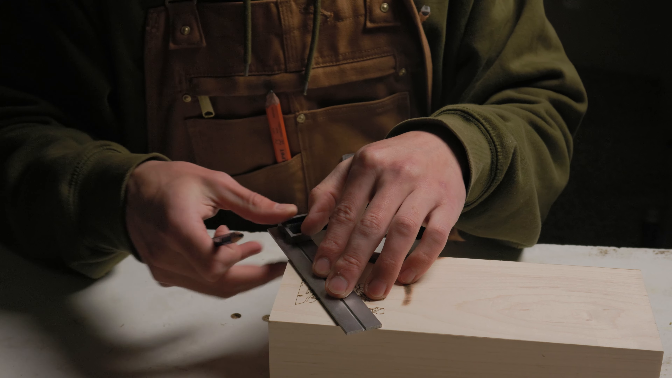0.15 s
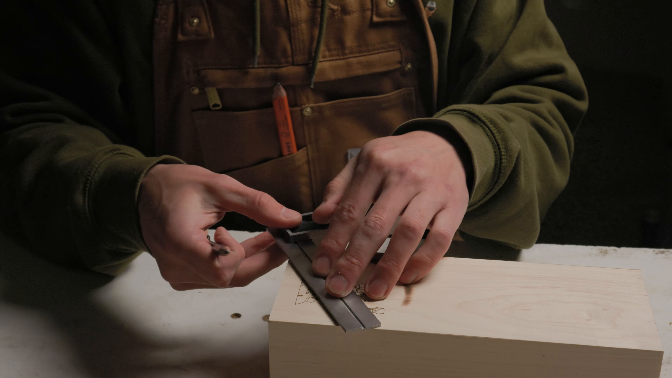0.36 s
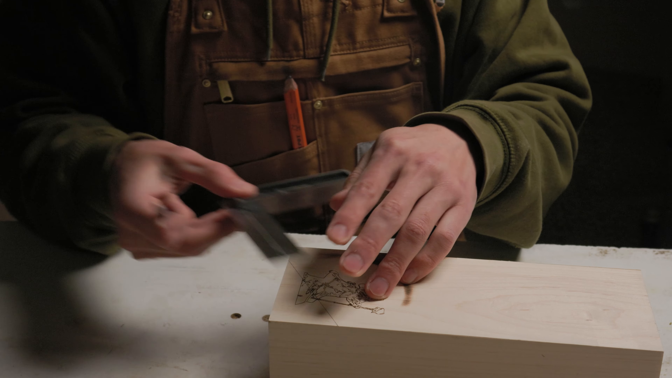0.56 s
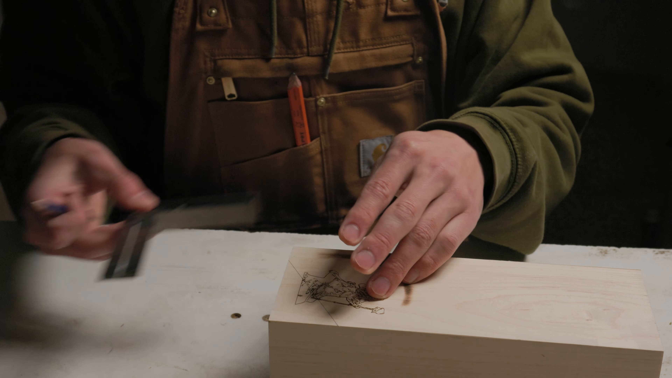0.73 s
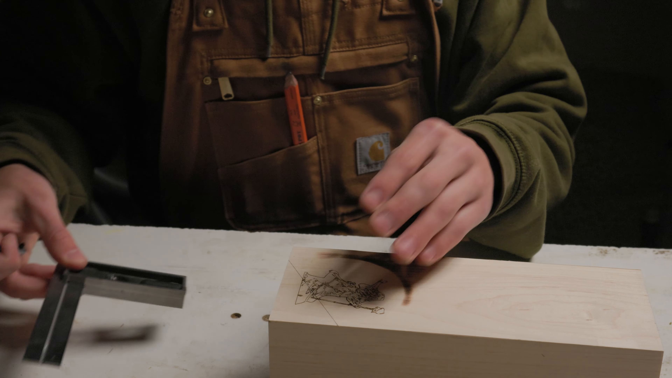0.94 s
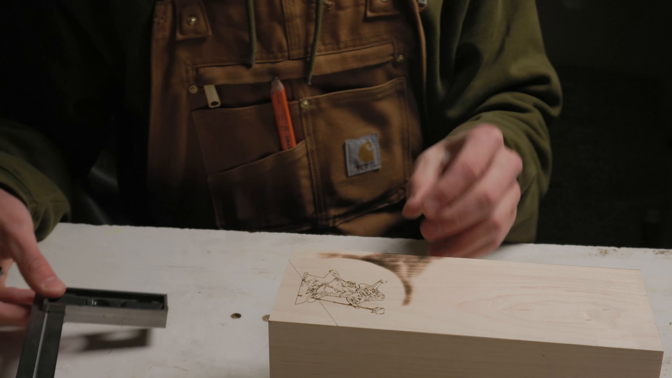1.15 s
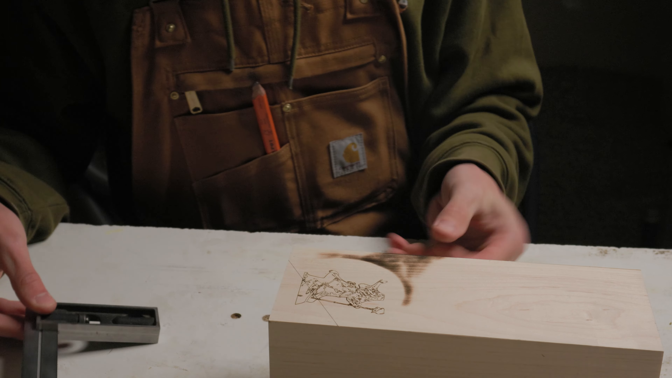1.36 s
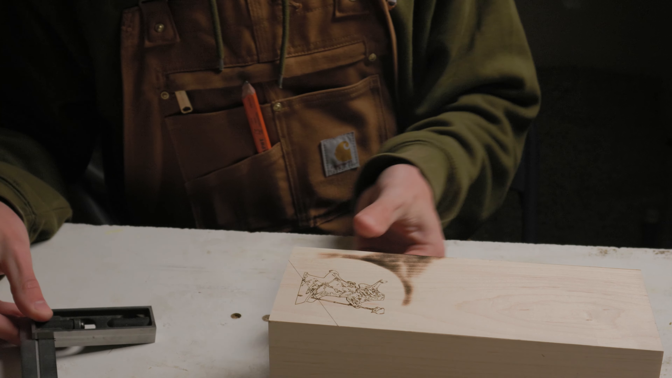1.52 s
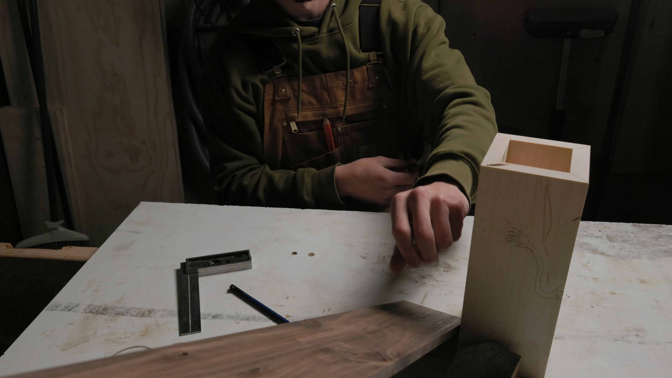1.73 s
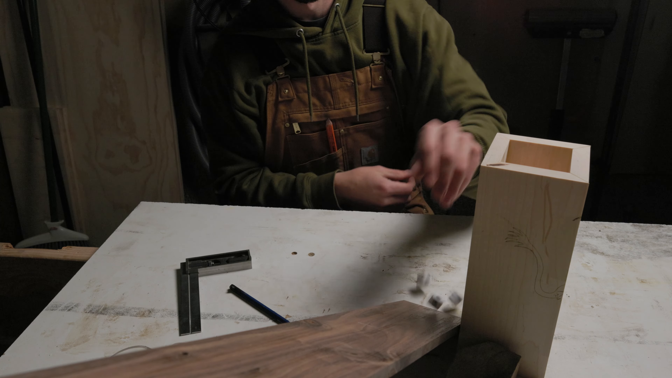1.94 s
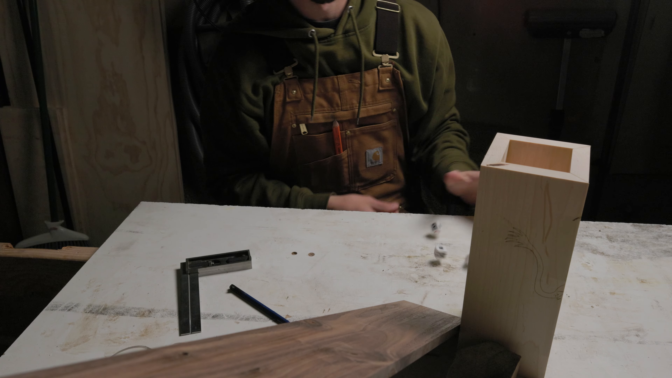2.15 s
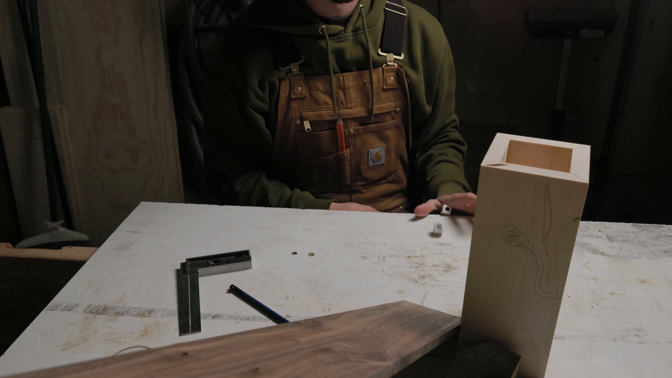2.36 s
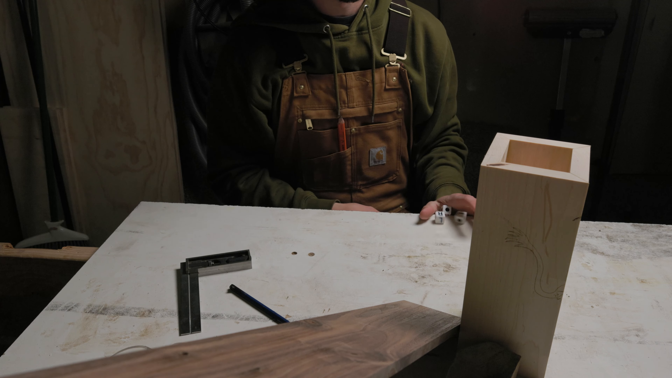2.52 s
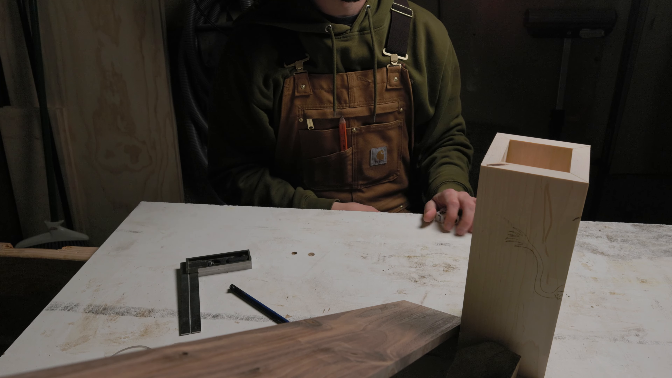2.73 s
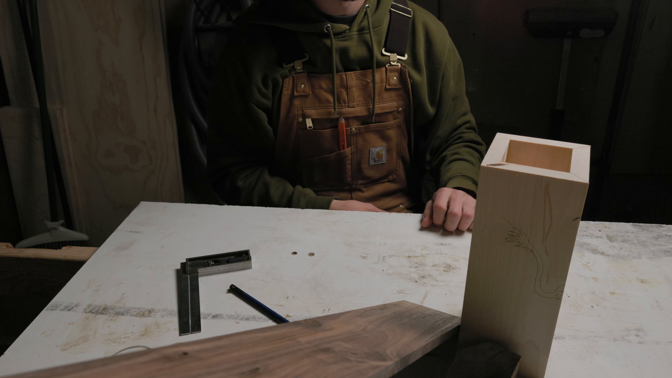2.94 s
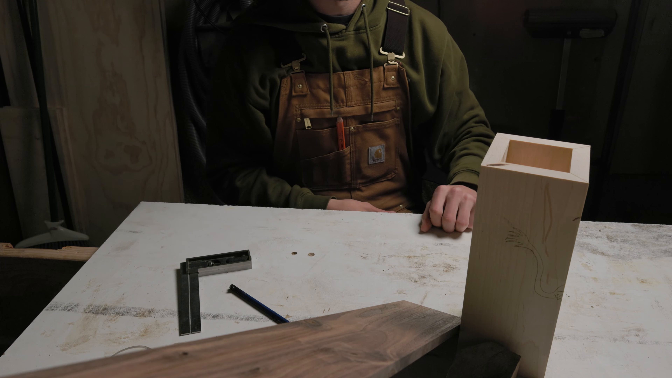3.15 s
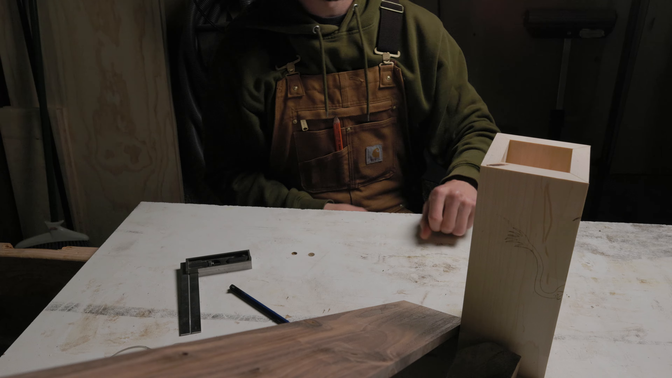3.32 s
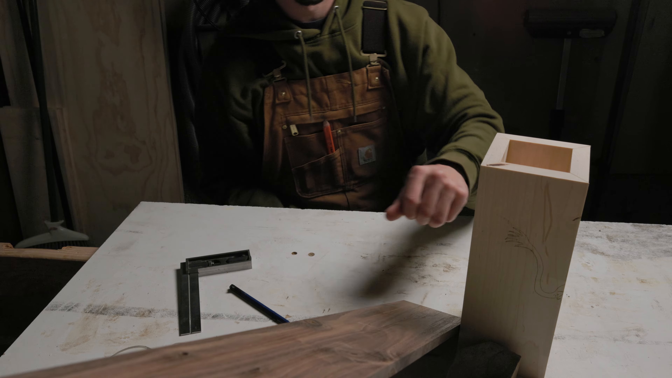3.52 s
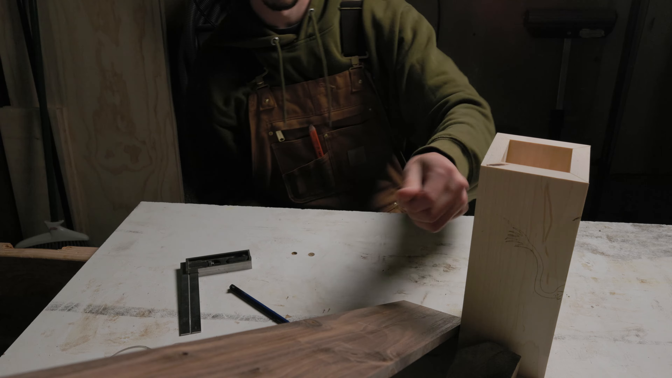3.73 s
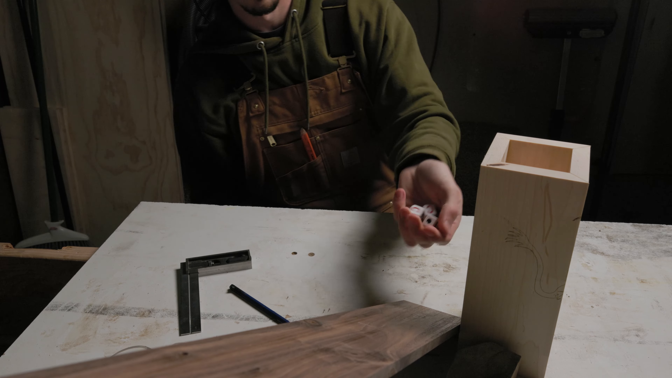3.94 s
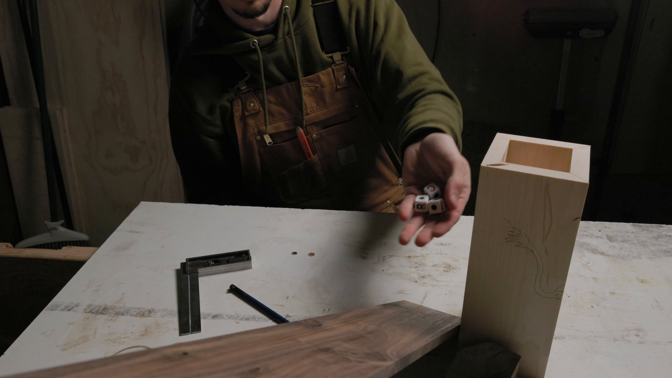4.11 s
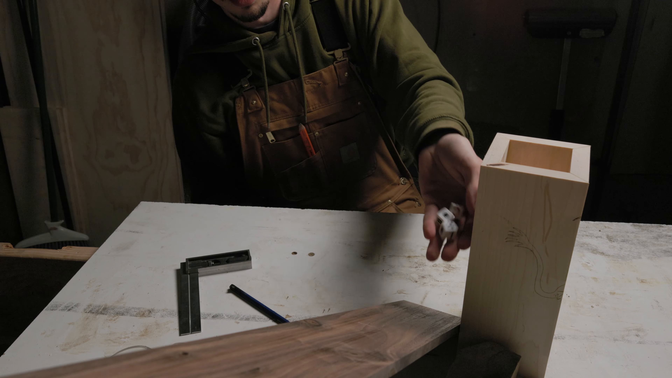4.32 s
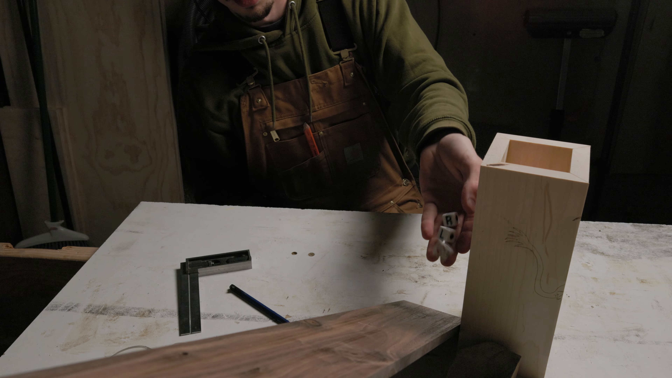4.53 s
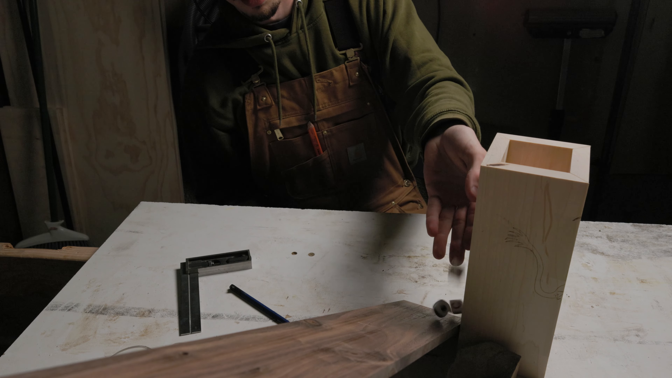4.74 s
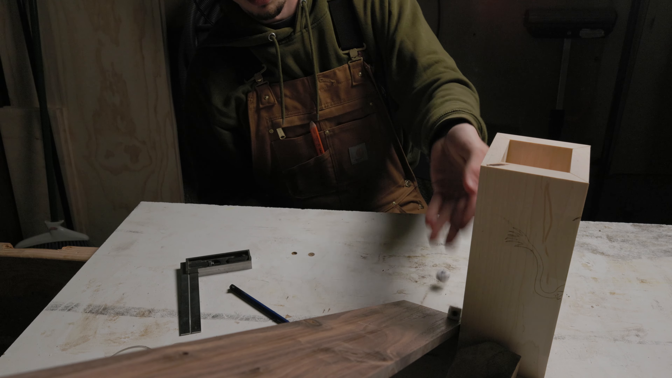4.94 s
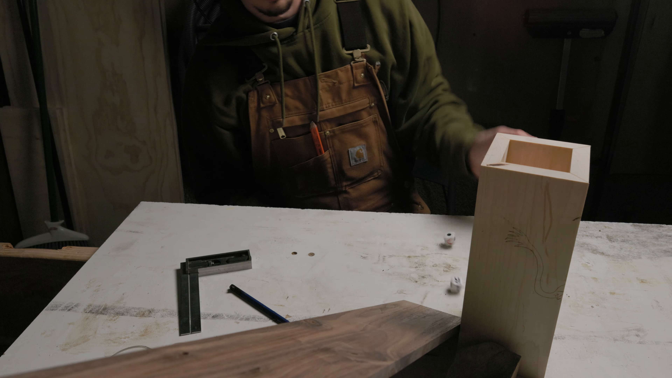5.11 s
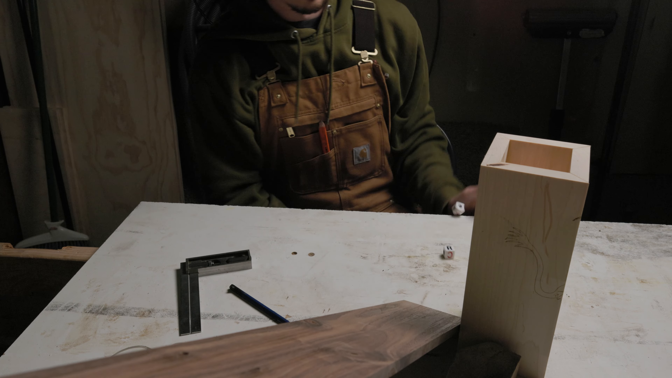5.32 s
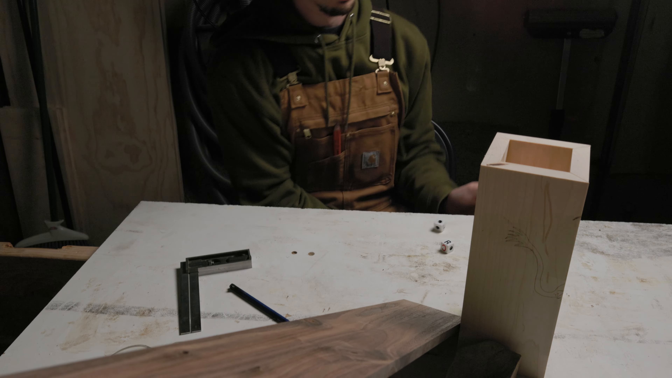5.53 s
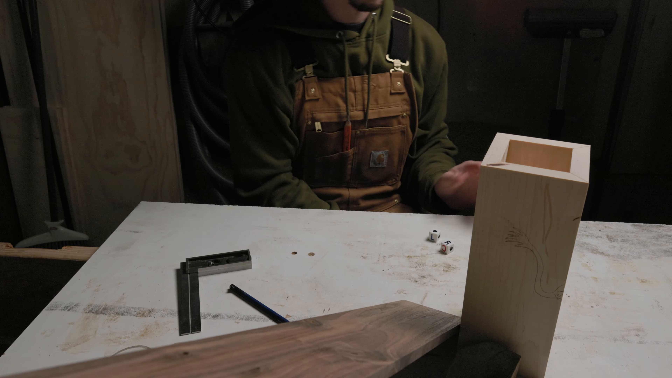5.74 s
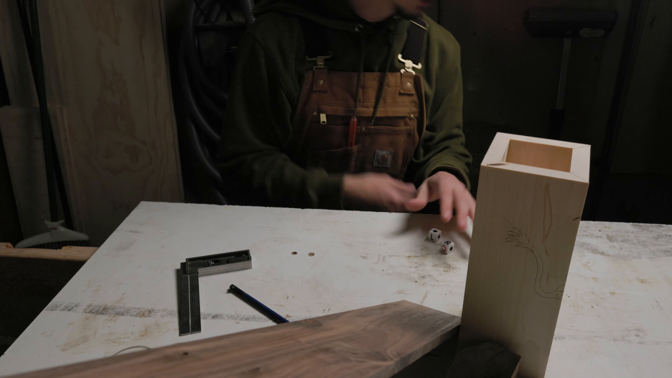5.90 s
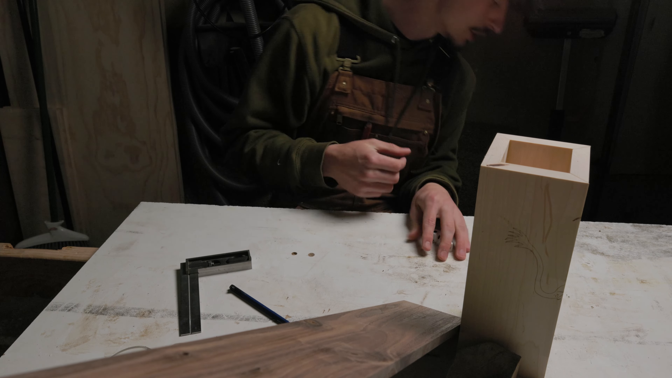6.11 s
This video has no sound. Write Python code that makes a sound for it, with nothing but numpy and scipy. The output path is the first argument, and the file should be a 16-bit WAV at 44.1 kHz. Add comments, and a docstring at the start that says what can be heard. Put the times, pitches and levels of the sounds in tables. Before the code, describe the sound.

A metal square clinks onto a bench, then dice crack twice against a hollow wooden box, bounce and rattle to rest in a quiet workshop.

```python
"""A small workshop, with a faint fan hum: a steel square is laid on the bench, then dice are thrown twice
at a wooden dice tower. Each blow is a sharp push that sets ringing modes and a dense short grain of the wood going.
The dice bounce and tumble to rest as ever softer contacts; they click in a palm, and a hand comes down
and sweeps them up in bursts of coloured noise. The room answers with noise tails, the fan with slow unsteady tones."""
import sys
import numpy as np
from scipy import signal
from scipy.fft import rfft, irfft, next_fast_len
from scipy.io import wavfile
from scipy.ndimage import map_coordinates

SR = 44100
rng = np.random.default_rng(int(sys.argv[2]) if len(sys.argv) > 2 else 0)


def wav_record(signal):
    """Record a signal, one row per channel, as 16-bit PCM in the file named by sys.argv[1]."""
    frames = np.transpose(np.atleast_2d(signal))
    bounded = np.clip(frames, -1, 1)
    # unit amplitude maps onto the largest positive 16-bit level
    quanta = np.round(bounded * 32767).astype(np.int16)
    wavfile.write(sys.argv[1], SR, quanta)


N = 272035
TIME = np.arange(N) / SR  # s
HIT_SIZE = 8192  # samples in one contact

# Dice striking the tower. Each row: time in s, nominal peak in dB, treble share in dB.
TOWER_HITS = [(1.947, -4, -43), (1.956, -3.5, -44), (1.988, -13, -33), (1.992, -13.5, -29),
              (2.001, -9.5, -44), (2.019, -16.5, -45), (2.054, -15.5, -25.5), (2.063, -13.5, -39),
              (4.763, -4.5, -35), (4.789, -22, -24), (4.829, -8, -30.5), (4.834, -13, -21.5),
              (4.851, -4.5, -36.5), (4.895, -12, -33.5), (4.906, -12, -31.5), (4.92, -17.5, -38),
              (4.934, -9.5, -31.5), (4.943, -13, -30), (4.959, -15.5, -28.5), (5.004, -18, -24),
              (5.01, -14.5, -29)]
# Ringing of the tower walls. Each row: frequency in Hz, width in Hz, relative strength in dB.
TOWER_MODES = [(143, 4.4, 12.5), (176, 6.5, 16.5), (205, 16, 13), (391, 8.8, 13), (397.8, 3.6, 19),
               (625.5, 32, 11.5), (995, 58, 9.5), (1100, 40, 7), (1375, 77, 1), (1843, 26, 14),
               (1953, 34, 12), (2471, 90, 15.5), (3074, 85, 15), (3794, 58, 14), (4500, 90, 3)]
# Colour of one blow on the tower. Each row: frequency in Hz, relative gain in dB.
TOWER_COLOUR = [(50, -41), (130, -15.5), (300, -20.5), (600, -14), (1100, -5), (2000, -4), (2900, -5),
                (3700, -4.5), (4600, -8.5), (7500, -22.5), (10000, -36.5), (12500, -41), (15500, -51.5)]
# Dice landing on the bench. Each row: time in s, nominal peak in dB, treble share in dB,
# drop from the first clack to the second in dB.
BOUNCES = [(2.113, -17, -27.5, 4), (2.169, -21, -21, 14), (2.229, -20, -21, 1), (2.234, -20, -26, 5),
           (2.298, -22.5, -25, 11), (2.318, -20.5, -19.5, 5), (2.373, -26, -27, 5),
           (2.389, -23.5, -23.5, 14), (2.423, -18.5, -19.5, 11), (2.539, -27, -25, 3),
           (2.595, -29, -18, 10), (2.609, -27.5, -17, 9), (2.639, -29.5, -17, 3), (2.703, -32.5, -17, 3),
           (2.821, -37, -14, 8), (5.082, -21.5, -26, 5), (5.096, -20.5, -26, 12), (5.138, -20.5, -26.5, 7),
           (5.192, -15.5, -21, 9.5), (5.309, -19.5, -26, 10), (5.323, -22, -20, 7), (5.434, -25.5, -39, 5),
           (5.509, -25.5, -31, 2.5), (5.578, -32, -14.5, 7), (5.677, -28.5, -17, 4), (5.712, -29, -18.5, 4)]
# Spells of dice rolling over the bench. Each row: start in s, end in s, level at the start in dB.
ROLLS = [(2.101, 2.513, -41.5), (2.609, 2.87, -46.5), (5.021, 5.06, -37.5), (5.11, 5.42, -39.5),
         (5.519, 5.67, -44.5)]
# Ringing of the bench top. Each row: frequency in Hz, width in Hz, relative strength in dB.
BENCH_MODES = [(188, 142, 16.5), (372, 41, 11), (633, 45, 9.5), (970, 43, 13), (1127, 50, 9),
               (1408, 18, 12.5), (2153, 37, 8.5), (2396, 89, -3), (3500, 100, -2)]
# Colour of one blow on the bench. Each row: frequency in Hz, relative gain in dB.
BENCH_COLOUR = [(50, -41), (130, -10.5), (300, -14), (700, 1.5), (1500, 2), (3200, 5.5), (4500, -3),
                (7500, -21), (10000, -33), (12500, -41.5), (15500, -39)]
# A soft blow is richer in bass. Each row: frequency in Hz, share of the knock dB (a ratio).
KNOCK_SHARE = [(1100, 0.64), (2400, 0)]
# A hard corner is richer in treble. Each row: frequency in Hz, share of the snap dB (a ratio).
SNAP_SHARE = [(3300, 0), (6500, 1.36), (12000, 1.5)]
# The square meeting the bench, a short clink. Each row: time in s, level in dB before the rise, t60 in s.
CLINK = [(1.4479, -37.5, 0.027)]
# Colour of the clink. Each row: frequency in Hz, relative gain in dB.
CLINK_COLOUR = [(500, 1), (1600, 2), (3200, 4.5), (4500, -2), (6500, -10), (7500, -8), (8500, -1),
                (10000, -18), (12500, -16), (15500, -23.5)]
# Tones of the ringing steel. Each row: frequency in Hz, relative level in dB, t60 in s.
STEEL_TONES = [(3200, -12, 0.21), (4930, -18, 0.32), (5690, -10, 0.18), (7030, -8, 0.25), (7477, -16, 0.3),
               (8340, -1.5, 0.051), (9600, -1, 0.047), (10410, -26, 0.42), (11050, -10, 0.11),
               (12200, -14, 0.12), (12720, -17, .14)]
# The dull knock under the clink. Each row: time in s, level in dB before the rise, t60 in s.
SET_DOWN = [(1.4485, -36.5, 0.2)]
# Colour of that knock. Each row: frequency in Hz, relative gain in dB.
SET_DOWN_COLOUR = [(100, -13), (220, -10), (310, 2.5), (410, -8), (520, -0.5), (800, -0.5), (1200, -0.5),
                   (1800, -12.5), (3000, -26.5), (6000, -48)]
# The hand coming down on the bench. Each row: time in s, level in dB before the rise, t60 in s.
THUDS = [(5.707, -35.5, 0.1), (5.719, -33, 0.09), (5.741, -34.5, 0.054), (5.754, -40, 0.066),
         (5.775, -43.5, .08)]
# Colour of the thuds. Each row: frequency in Hz, relative gain in dB.
THUD_COLOUR = [(100, -33), (200, -6), (420, -4.5), (495, 7.5), (620, -16), (750, -6), (950, 2.5), (1150, 1),
               (1420, -4.5), (1550, -6.5), (2500, -11.5), (4000, -20), (8000, -66)]
# Dice touching each other, in flight or in the hand. Each row: time in s, nominal peak in dB.
DIE_CLICKS = [(3.047, -48.5), (3.9916, -39.5), (4.1024, -44), (4.141, -56.5), (4.3477, -48), (4.367, -51.5),
              (4.4752, -54), (4.6538, -46.5), (4.7269, -50), (6.034, -43.5), (6.045, -38.5)]
# Dice shifting in the opening palm. One row: start in s, end in s, level in dB.
JOSTLE = (4.37, 4.56, -67)
# Colour of die against die. Each row: frequency in Hz, relative gain in dB.
DIE_COLOUR = [(100, -41), (1000, -19.5), (2500, -11.5), (3700, -2), (5500, -0.5), (8000, -10),
              (11000, -23.5), (13000, -22), (15500, -41.5)]
# The hand brushing over dice and bench. Each row: time in s, level in dB before the rise, t60 in s.
SWEEPS = [(3.996, -56.5, .1), (4.11, -71, 0.45), (4.37, -73, 0.16), (5.772, -45, 0.16), (6.034, -48, 0.21),
          (6.1, -70, 0.44)]
# Colour of the brushing. Each row: frequency in Hz, relative gain in dB.
SWEEP_COLOUR = [(300, -17), (2000, -7), (3500, 5.5), (5000, 3.5), (8500, -4), (12000, -22), (15000, -30.5)]
# A faint squeak as the fingers slide. Each row: time in s, level in dB before the rise, t60 in s.
SQUEAK = [(6.125, -61, .6)]
# Colour of the squeak. Each row: frequency in Hz, relative gain in dB.
SQUEAK_COLOUR = [(2100, -56), (2450, 2), (2600, 1), (3000, -56)]
# The bench shuddering under an arm. Each row: time in s, level in dB before the rise, t60 in s.
SHUDDERS = [(2.43, -58, .3), (5.57, -55, .45)]
# Colour of the shudder. Each row: frequency in Hz, relative gain in dB.
SHUDDER_COLOUR = [(15, -26), (35, -2), (55, -7), (100, -25), (300, -80)]
# Steady tones of the fan. Each row: frequency in Hz, mean rms level in dB.
FAN = [(125, -76), (500.6, -78.5), (818, -84.5)]
# Colour of the workshop air. Each row: frequency in Hz, relative gain in dB.
AIR = [(12, -49.5), (20, -11.5), (124, -4.5), (155, -8.5), (263, -8), (294, -11.5), (347, -8), (377, -10),
       (457, -10), (497, -11), (713, -11), (994, -10), (1110, -15), (3550, -26.5), (15000, -63.5)]
# Treble roll-off of the recorder. Each row: frequency in Hz, gain in dB.
BAND_LIMIT = [(11000, 0), (12700, -1.5), (14500, -6), (15500, -13), (15900, -60), (16500, -120)]

TOUCH_S = .001  # from first touch to full push
BENCH_CREST_DB = 10  # peak of a bench clack over its body
TIP_S, TIP_SPREAD_S = .0102, .0012  # between the two clacks of a landing, and its spread
SLOWING_DB_PER_S = 15.5  # friction drains the rolling dice
TAP_T60_S, TAP_SPREAD_DB = .015, 5.5  # grain of one rolling tap, and spread in its level
# The fan's whine swells and sinks: pitch, usual rms level, height, moment and half width of the swell.
WHINE_HZ, WHINE_DB, SWELL_DB, SWELL_AT_S, SWELL_WIDTH_S = 976, -73.5, 4, 3.9, .7


def tower():
    """Dice crack against the hollow wooden box; its far side rings into the room with other mode strengths."""
    hits = blows(TOWER_HITS, crest_db=9.5, firm_db=-8.5, dulling=0.35, face_db=-32)
    near = contacts(hits, TOWER_COLOUR, TOWER_MODES, ring_db=2.5, grain_db=0.5, grain_t60=.026,
                    scatter_db=3.5, tint_db=3.0)
    far = contacts(hits, TOWER_COLOUR, TOWER_MODES, ring_db=-8.0, grain_db=-11.5, grain_t60=.02,
                   scatter_db=4.0, tint_db=1.5)
    echo = workshop(far, wet_db=-8.0) - far  # the far side is heard only by way of the room
    return near + echo


def bounces(tip_dull_db=1):
    """A die lands on one corner of the bench top, then tips onto the next with a weaker, duller clack."""
    gaps = TIP_S + TIP_SPREAD_S * rng.uniform(-1, 1, len(BOUNCES))
    clacks = []
    for (s, peak, treble, loss), gap in zip(BOUNCES, gaps):
        clacks.append((s, peak, treble))
        clacks.append((s + gap, peak - loss, treble - tip_dull_db))
    landings = blows(clacks, BENCH_CREST_DB, firm_db=-31.5, dulling=0.76, face_db=-26.5)
    hits = contacts(landings, BENCH_COLOUR, BENCH_MODES, ring_db=-3.0, grain_db=-6.0, grain_t60=0.022,
                    scatter_db=2, tint_db=4.0)
    return workshop(hits, wet_db=-4)


def tumbling(rate=100, knock_db=2, knock_spread_db=2.0, snap_db=-3, snap_spread_db=8):
    """Rolling dice tap the bench edge after edge, rate times a second, softening on the whole as they slow."""
    taps = []
    for start, end, db in ROLLS:
        count = int((end - start) * rate)
        jitter, size, knock, snap = rng.uniform(-1, 1, (count, 4)).T
        age = (np.arange(count) + (1 + jitter) / 2) / rate
        level = db - SLOWING_DB_PER_S * age + TAP_SPREAD_DB * size
        knocks = knock_db + knock_spread_db * knock
        snaps = snap_db + snap_spread_db * snap
        taps += list(zip(start + age, level, knocks, snaps))
    hits = contacts(taps, BENCH_COLOUR, BENCH_MODES, ring_db=-3, grain_db=-1.0, grain_t60=TAP_T60_S,
                    scatter_db=3, tint_db=1.0)
    return workshop(hits, wet_db=-1.0)


def square():
    """The steel square clinks and rings in decaying tones as it meets the bench, which knocks under it."""
    track, t = np.zeros(N), np.arange(SR // 2) / SR
    ring = np.zeros(len(t))
    for hz, db, t60 in STEEL_TONES:
        ring += amp(db) * fade(t, t60) * np.sin(2 * np.pi * (hz * t + rng.random()))
    add(track, CLINK[0][0], amp(-45.5) * ring)
    clink = workshop(bursts(CLINK, CLINK_COLOUR, rise=0.00044), wet_db=-7.0)
    knock = workshop(bursts(SET_DOWN, SET_DOWN_COLOUR, rise=.0015), wet_db=-3.5)
    return track + clink + knock


def thuds():
    """The bench top answers the hand with dull knocks."""
    return workshop(bursts(THUDS, THUD_COLOUR, rise=0.00099), wet_db=0)


def hand():
    """Dice click together; the hand brushes the bench and squeaks, and the arm shakes the bench in the bass."""
    clicks = contacts(die_touches(), DIE_COLOUR, [], ring_db=0, grain_db=-5.5, grain_t60=.006,
                      scatter_db=0, tint_db=3)
    brush = bursts(SWEEPS, SWEEP_COLOUR, rise=0.0076)
    squeak = bursts(SQUEAK, SQUEAK_COLOUR, rise=0.011)
    shudder = bursts(SHUDDERS, SHUDDER_COLOUR, rise=0.0082)
    return workshop(clicks + brush + squeak, wet_db=-5.5) + shudder


def background(waver_db=1.0):
    """Steady air noise and the slightly unsteady tones of a fan, wandering in level and phase."""
    whine_db = WHINE_DB + SWELL_DB * np.exp(-((TIME - SWELL_AT_S) / SWELL_WIDTH_S) ** 2)
    tones = np.zeros(N)
    for hz, db in FAN + [(WHINE_HZ, whine_db)]:
        level = amp(db + waver_db * wobble(1.2)) * np.sqrt(2)  # rms to peak of a sine
        tones += level * np.sin(2 * np.pi * hz * TIME + .5 * wobble(3.5))
    return tones + amp(-65) * noise(AIR)


def blows(rows, crest_db, firm_db, dulling, face_db):
    """Blows as (s, level, knock, snap). One softer than firm_db stays longer in contact and so knocks more;
    one with more treble than a flat face gives (face_db) is a corner and snaps."""
    return [(s + TOUCH_S, peak - crest_db, dulling * (firm_db - peak), treble - face_db)
            for s, peak, treble in rows]


def die_touches(crest_db=13, firm_db=-45, sharpening=.7, spread_db=3, snap_db=-7, count=6):
    """Die against die, as (s, level, knock, snap): harder touches snap more; faint ones fill the jostle."""
    touches = [(s + TOUCH_S, peak - crest_db, 0, sharpening * (peak - firm_db)) for s, peak in DIE_CLICKS]
    start, end, db = JOSTLE
    for k, (u, v) in enumerate(rng.random((count, 2))):
        s = start + (end - start) * (k + u) / count
        touches.append((s, db + spread_db * (2 * v - 1), 0, snap_db))
    return touches


def contacts(rows, colour, modes, ring_db, grain_db, grain_t60, scatter_db, tint_db):
    """Each contact is a sharp push, a dense short grain, and any main modes at new random strengths."""
    track, t, hz = np.zeros(N), np.arange(HIT_SIZE) / SR, np.fft.rfftfreq(HIT_SIZE, 1 / SR)
    resonances = [amp(db + ring_db) * 1j * hz * width / (centre ** 2 - hz ** 2 + 1j * hz * width)
                  for centre, width, db in modes]
    resonances = np.array(resonances).reshape(-1, len(hz))  # also valid with no modes
    base, knock, snap = along(colour, hz), along(KNOCK_SHARE, hz), along(SNAP_SHARE, hz)
    grain = fade(t, grain_t60) * (t > .0006)  # starts just after the push
    grain *= amp(grain_db) / np.linalg.norm(grain)
    # bending waves carry the treble faster than the bass, so the push spreads into a short chirp
    bending = np.exp(-1j * np.sqrt(hz / 14))
    knots = np.arange(0, SR / 2, 600)  # Hz
    attack = round(.003 * SR)  # the level is set over the first 3 ms
    for s, db, knock_db, snap_db in rows:
        # where the die lands sets the sign and size of every mode, and tints the whole blow
        signs = rng.choice([-1, 1], len(modes))
        strengths = signs * amp(scatter_db * rng.standard_normal(len(modes)))
        tint = tint_db * np.interp(hz, knots, rng.standard_normal(len(knots)))
        body = 1 + rfft(grain * rng.standard_normal(HIT_SIZE)) + strengths @ resonances
        push = causal(base + tint + knock_db * knock + snap_db * snap)
        hit = irfft(body * bending * push)
        add(track, s, amp(db) * hit / np.sqrt(np.mean(hit[:attack] ** 2)))
    return track


def causal(db):
    """The minimum-phase response with these gains: energy comes as early as the spectrum allows."""
    cepstrum = irfft(np.log(amp(db)))
    cepstrum[1:HIT_SIZE // 2] *= 2
    cepstrum[HIT_SIZE // 2 + 1:] = 0
    return np.exp(rfft(cepstrum))


def bursts(rows, colour, rise):
    """Soft contacts: noise that swells with time constant rise (s) and dies away."""
    level, t = np.zeros(N), np.arange(SR // 2) / SR
    for s, db, t60 in rows:
        add(level, s, amp(db) * fade(t, t60) * (1 - np.exp(-t / rise)))
    return level * noise(colour)


def workshop(x, wet_db, t60=0.41, gap=0.0026):
    """The sound with its room echo: after a gap (s), a noise tail drawn anew for each 50 ms of sound."""
    t, block = np.arange(SR // 2) / SR, SR // 20
    shape = fade(t, t60) * np.clip(t / gap - 1, 0, 1)
    shape *= amp(wet_db) / np.linalg.norm(shape)
    out = x.copy()
    for start in range(0, N, block):
        part = x[start:start + block]
        if np.abs(part).max() > 1e-5:  # skip near silence
            tail = shape * rng.standard_normal(len(t))
            add(out, start / SR, signal.fftconvolve(part, tail))
    return out


def noise(colour):
    """Coloured noise of rms 1."""
    size = next_fast_len(N)
    gain = amp(along(colour, np.fft.rfftfreq(size, 1 / SR)))
    return unit(irfft(rfft(rng.standard_normal(size)) * gain, size)[:N])


def wobble(rate):
    """A smooth random curve, rate knots a second."""
    return map_coordinates(rng.standard_normal(int(N * rate / SR) + 4), [TIME * rate])


def fade(t, t60):
    """Decay by 60 dB in t60 seconds."""
    return np.exp(-np.log(1000) * t / t60)


def add(track, s, sound):
    """Mix a sound into the track at s seconds."""
    part = track[max(round(s * SR), 0):][:len(sound)]
    part += sound[:len(part)]


def along(points, hz):
    """Read a curve of (Hz, value) points on a log frequency axis."""
    f, v = np.transpose(points)
    return np.interp(np.log(hz + 1), np.log(f + 1), v)


def amp(db):
    """Decibels to amplitude."""
    return 10 ** (np.asarray(db) / 20)


def unit(x):
    """Scale to rms 1."""
    return x / np.sqrt(np.mean(x ** 2) + 1e-20)


def scene():
    """Tower, bench, square and hand over the workshop background, on one channel."""
    dice = tower() + bounces() + tumbling()
    handling = square() + thuds() + hand()
    return (dice + handling + background())[None]


def record(dry):
    """The recorder dulls the top treble and keeps next to nothing above its band limit."""
    size = next_fast_len(N + SR // 2)
    gain = amp(along(BAND_LIMIT, np.fft.rfftfreq(size, 1 / SR)))
    return irfft(rfft(dry, size) * gain, size)[:, :N]


dry = scene()
out = record(dry)
wav_record(out)
```